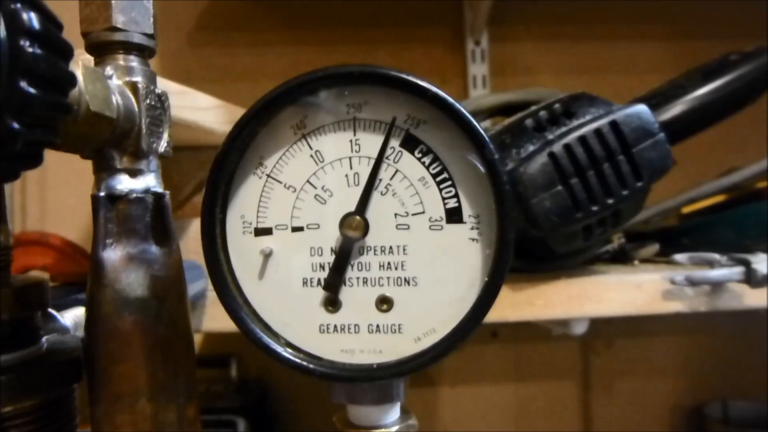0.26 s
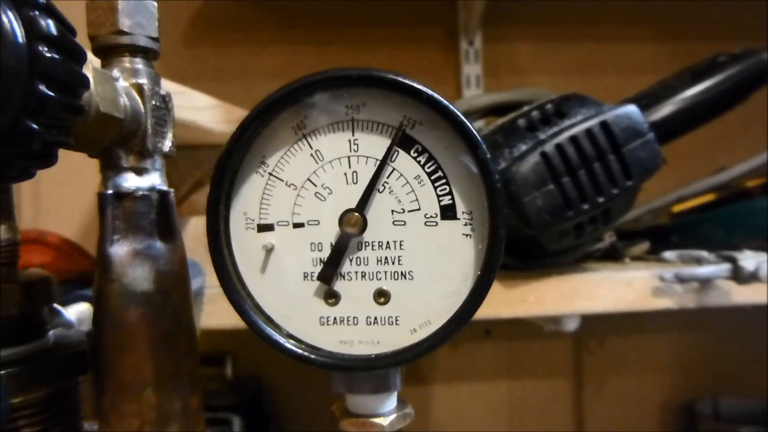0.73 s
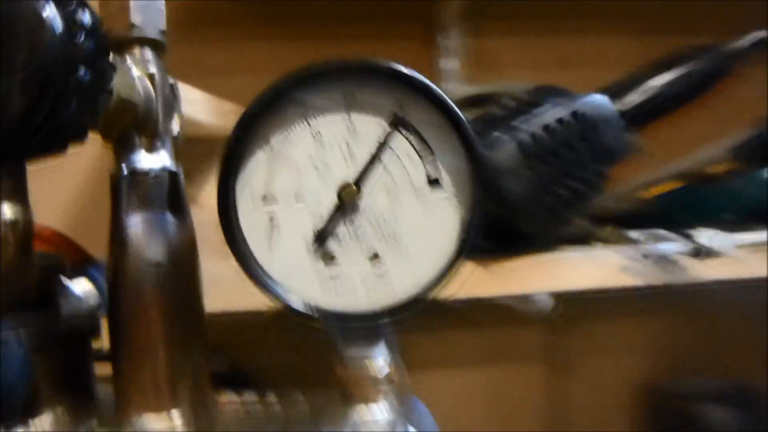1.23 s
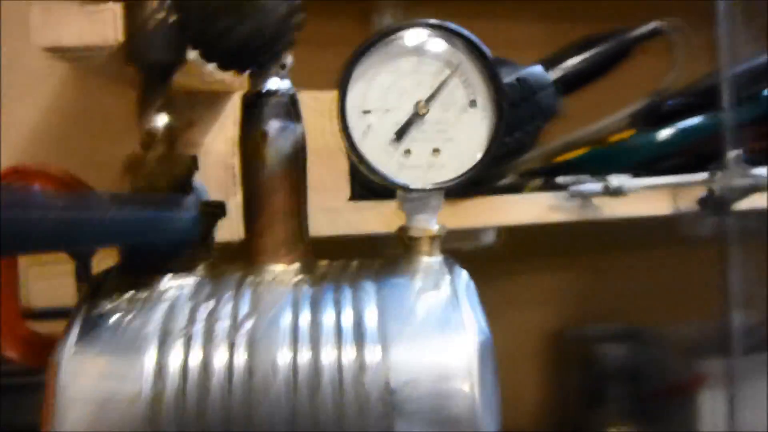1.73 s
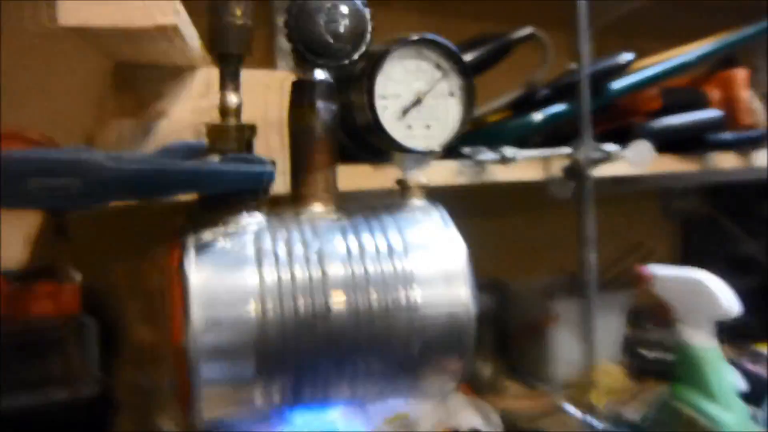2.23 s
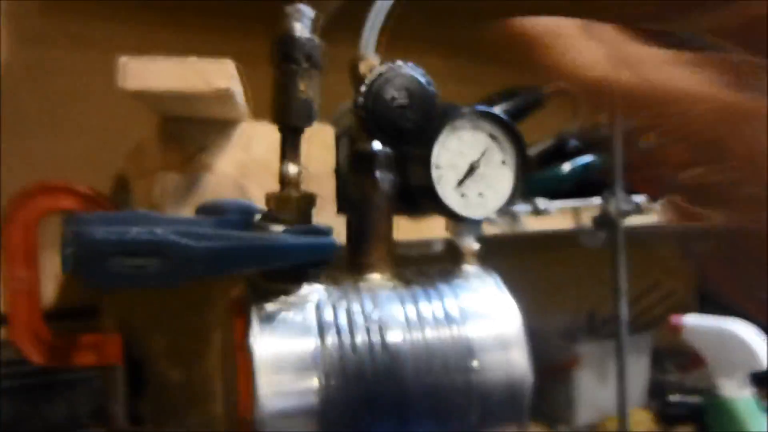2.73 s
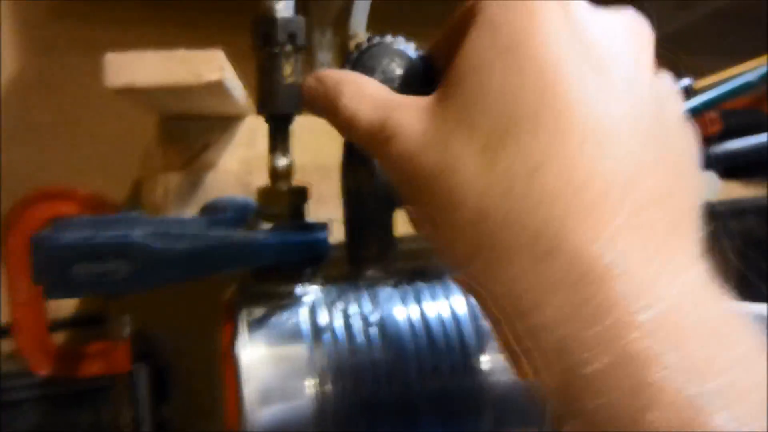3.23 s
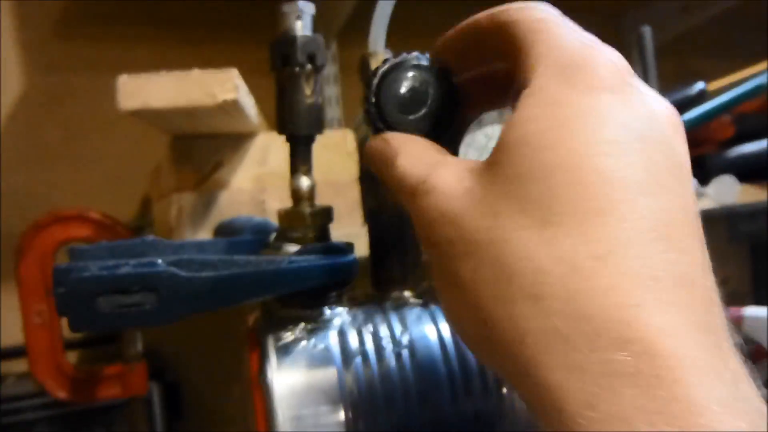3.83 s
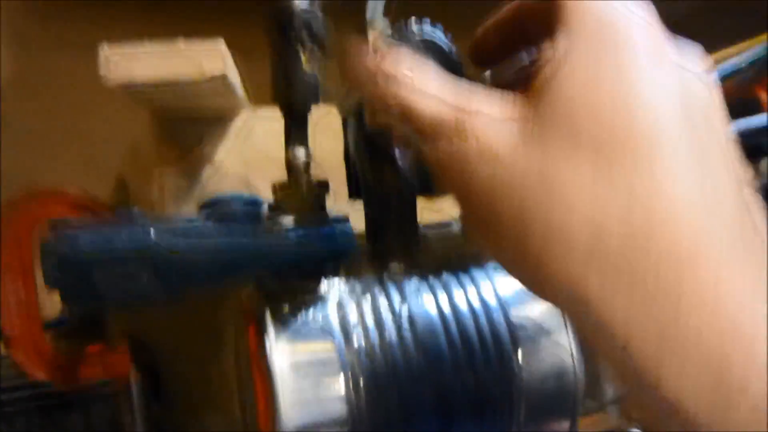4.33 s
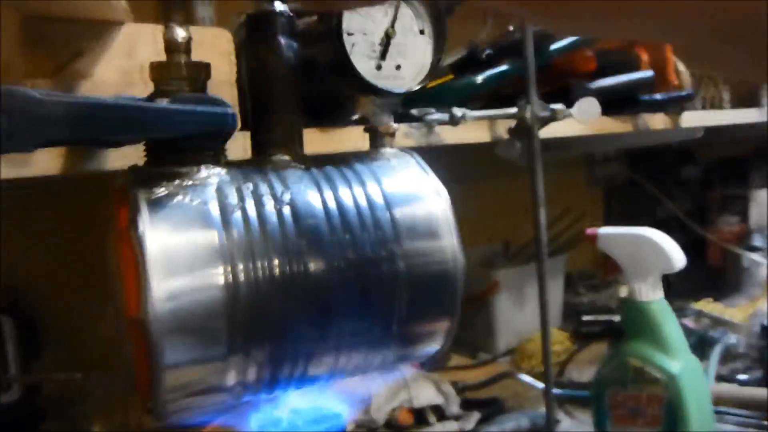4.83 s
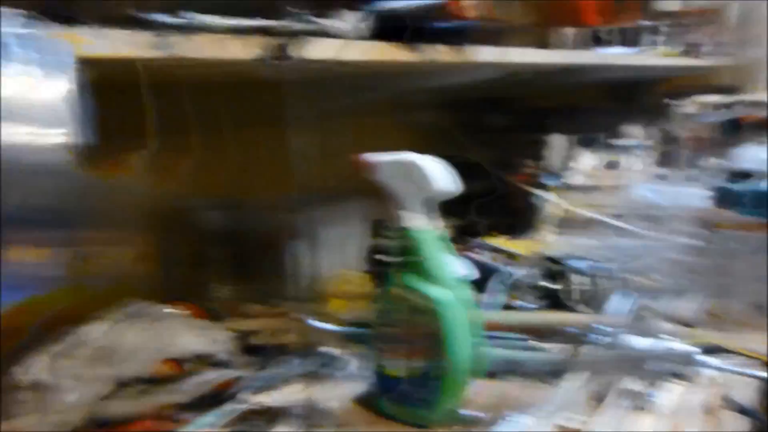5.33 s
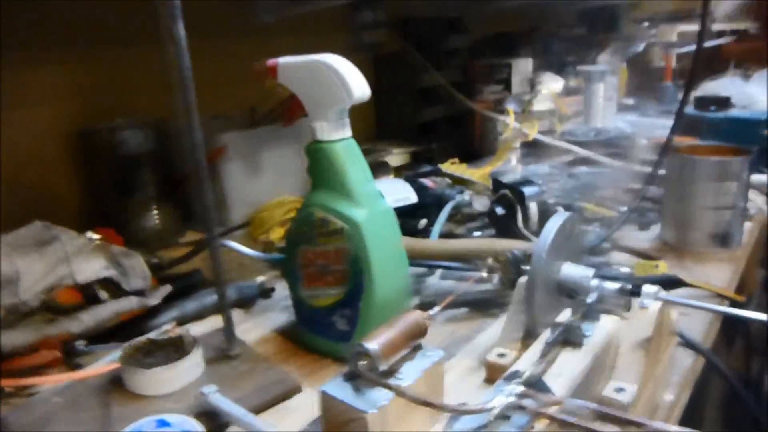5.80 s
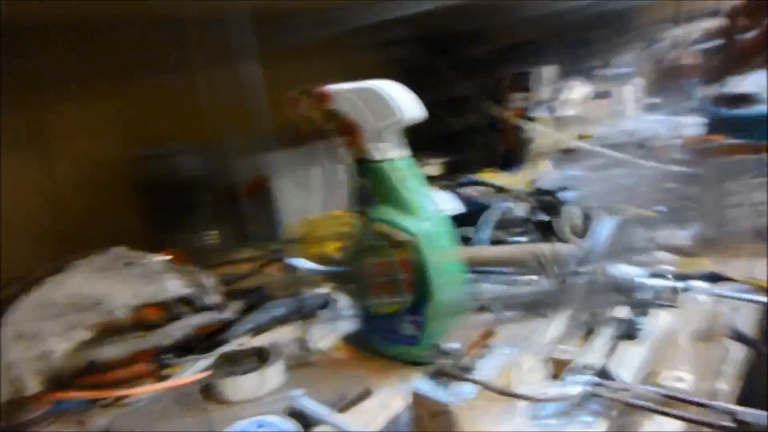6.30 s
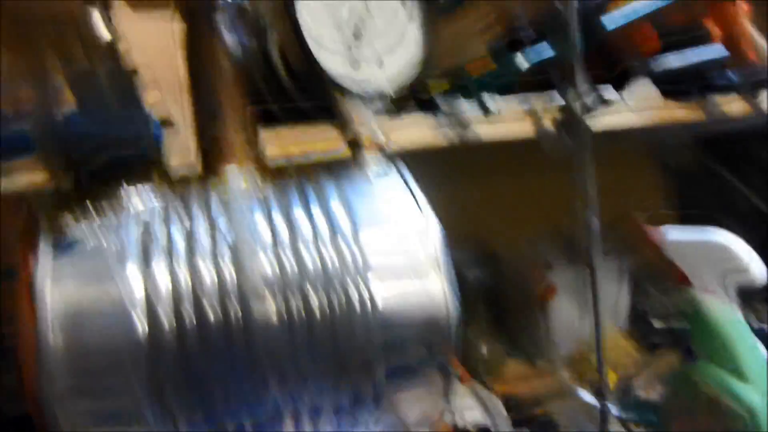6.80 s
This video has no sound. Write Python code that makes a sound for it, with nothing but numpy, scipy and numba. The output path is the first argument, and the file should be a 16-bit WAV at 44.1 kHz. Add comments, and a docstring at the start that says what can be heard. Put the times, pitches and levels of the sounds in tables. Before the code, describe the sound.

A small boiler rumbles and thumps under a steam hiss, with one loud valve blast before a model engine chuffs into motion.

```python
"""Tin boiler and model steam engine

A small boiler over a gas flame on a workshop bench. Its spring relief valve seeps, pops open, blows
and snaps shut; collapsing steam pockets thump in the shell. A hand opens the throttle and an engine
nearby chuffs, faster and faster. Automatic gain ducks under each blow and creeps back up."""
import sys
import numpy as np
from scipy import signal
from scipy.fft import rfft, irfft, next_fast_len
from scipy.io import wavfile
from numba import njit

SR = 44100
rng = np.random.default_rng(int(sys.argv[2]) if len(sys.argv) > 2 else 0)


def int16_out(signal):
    """Quantize to a 16-bit WAV file."""
    q = np.round(np.clip(np.atleast_2d(signal).T, -1, 1) * 32767)
    wavfile.write(sys.argv[1], SR, q.astype(np.int16))


N = 311346

# valve blows: (lift time [s], shut time [s], level [dB])
VALVE_BLOWS = [(-0.6, 0.019, -6), (2.63, 3.546, -13.5)]
# dips in the jet: (time [s], depth [dB], recovery [s])
JET_FALTERS = [(2.66, -3, 0.21), (2.965, -2, 0.047), (3.09, -3, 0.06), (3.261, -2.5, 0.12)]
# valve at the wandering microphone:
# (time [s], seep level [dB], left over right [dB], outlet resonance [Hz], bench echo lag [ms])
VALVE_AT_MIC = [(0, -31, 3, 5230, 0.92), (0.6, -31.5, 4, 5500, 0.89), (0.9, -32, 4, 5400, 0.94),
                (1.15, -32.5, 4, 5500, 0.91), (1.27, -31.5, 3, 5270, 0.91), (1.5, -32, 3, 5800, 0.82),
                (1.7, -30.5, 3, 6050, 0.51), (2.0, -33, 2, 6340, 0.58), (2.27, -31.5, 2.5, 5500, 0.53),
                (2.34, -33, 2, 5870, 0.57), (2.6, -34.5, 1.5, 5700, 0.52), (3.6, -39.5, 1, 5160, 0.49),
                (4.0, -37.5, .5, 4900, 0.41), (4.2, -36, .5, 4940, 0.43), (4.55, -36.5, 1, 4760, 0.455),
                (4.69, -34, 0.5, 5100, 0.44), (4.95, -34.5, 1, 5450, 0.36), (5.15, -34, 3, 6000, 0.44),
                (5.22, -35, 2.5, 6100, 0.5), (5.42, -35.5, 4.5, 5470, 0.59), (5.68, -36.5, 2, 5070, 0.62),
                (7.06, -35, 3, 5830, 0.44)]
# outlet resonances: (frequency ratio, width [Hz], level [dB])
OUTLET_MODES = [(1, 850, -2.5), (2.42, 1700, -9)]
# thin hiss of the valve near lifting, later of the steam line: (time [s], level [dB])
THIN_HISS = [(0.3, -45), (1.9, -40.5), (2.1, -34.5), (2.19, -34.5), (2.28, -36), (2.325, -30.5),
             (2.52, -30), (2.62, -28), (3.6, -43), (4.62, -38.5), (5.42, -37), (5.52, -32), (5.77, -29),
             (6.1, -32), (6.45, -32.5), (6.65, -48)]
# exhaust beats: (time [s], level [dB], preceding port whistle [dB])
EXHAUST_BEATS = [(5.707, -26, -90), (6.15, -24.5, -90), (6.322, -26, -41), (6.464, -25.5, -42.5),
                 (6.586, -25, -47), (6.697, -25, -43), (6.802, -25.5, -39.5), (6.906, -26.5, -41.5),
                 (6.998, -26.5, -45)]
# puffs within the slow first stroke: (time [s], level [dB])
FIRST_STROKE_LEAKS = [(5.77, -25.5), (6.017, -29.5)]
# port whistle of that stroke: (time [s], pitch [Hz], level [dB])
FIRST_STROKE_WHISTLE = [(5.72, 3200, -46), (5.78, 2620, -45), (5.85, 2190, -51), (5.93, 2120, -45),
                        (5.99, 2130, -53), (6.05, 2480, -43), (6.075, 2900, -41), (6.1, 3860, -40),
                        (6.12, 4200, -47)]
# boiling water: (time [s], rumble [dB], simmer [dB])
BOIL_LEVELS = [(0.1, -47.5, -54), (0.5, -49, -52), (1.0, -48.5, -52.5), (1.45, -50.5, -51), (2.0, -50, -52),
               (2.54, -48, -44), (3.6, -53.5, -57), (4.2, -51.5, -52.5), (4.8, -51.5, -53.5),
               (5.5, -49, -49), (6.23, -44, -43.5), (7.06, -47.5, -44)]
# steam pockets collapsing, valve lifting and seating: (time [s], knock drive [dB], boom drive [dB])
SHELL_THUMPS = [(0.004, -24, -26), (0.143, -20, -41), (0.23, -29, -44), (0.308, -36, -32), (0.43, -38, -63),
                (0.518, -40, -44), (0.543, -27, -35.5), (0.655, -41, -47), (0.756, -35, -27.5),
                (0.831, -30, -32), (0.883, -26, -35), (0.92, -30, -32), (0.975, -38, -56),
                (1.117, -36, -36), (1.203, -46, -34), (1.265, -39, -37), (1.327, -31, -35),
                (1.37, -37, -58), (1.396, -31, -40), (1.499, -24.5, -28), (1.653, -29, -32.5),
                (1.712, -26, -28), (1.729, -35, -41), (2.082, -26, -33), (2.158, -22.5, -28.5),
                (2.227, -21, -35), (2.539, -25, -30.5), (2.639, -23, -30.5), (2.795, -22, -32.5),
                (3.118, -11, -35), (3.538, -45, -31), (3.822, -44, -33), (3.886, -29, -33.5),
                (4.041, -52, -36), (4.167, -32, -36.5), (4.294, -37, -48), (4.358, -41, -40.5),
                (4.514, -37, -38), (4.848, -32, -37), (4.898, -43, -37), (4.97, -32, -30),
                (5.068, -35, -33), (5.17, -42, -26.5), (5.301, -31, -33.5), (5.39, -40, -32.5),
                (5.432, -27, -37), (5.502, -37, -38), (5.657, -31, -35), (5.849, -31, -37),
                (6.181, -35, -29), (6.267, -37, -33.5), (6.449, -50, -30)]
# shell resonances: (frequency [Hz], width [Hz], level [dB])
SHELL_MODES = [(200, 53, -8), (257, 40, -3.5), (311, 44, -14.5), (590, 100, -2), (790, 135, -5.5)]
# band the bench reflects: (low edge [Hz], high edge [Hz])
BENCH_BAND_HZ = [700, 15000]
# noise spectra: (frequency [Hz], relative density [dB])
JET_SPECTRUM = [(95, -41), (190, -14.5), (330, -13.5), (620, -14.5), (1050, -14), (1900, -16),
                (3300, -22.5), (3950, -7), (4450, -11), (5000, -4), (6000, -2.5), (7500, -10.5),
                (10000, -5.5), (12500, 1), (14200, 4.5), (15300, 1.5), (16000, 0.5)]
SPIT_SPECTRUM = [(500, -3), (2000, -1), (3300, 10), (6000, -3.5)]
SEEP_SPECTRUM = [(900, -20.5), (1500, -22), (2100, -16), (2500, -14.5), (3000, -12), (3450, -14.5),
                 (4050, -8), (4500, -12), (5100, -0.5), (6600, -3.5), (7300, -7), (8250, -7.5),
                 (10000, -15.5), (12800, -23.5), (15000, -20), (16000, -9.5)]
THIN_HISS_SPECTRUM = [(4410, -26), (7800, -4), (10300, -1), (13600, 3), (15200, -2), (16000, -10)]
CHUFF_SPECTRUM = [(470, -38), (800, -17), (1000, -5.5), (2530, -4.5), (2700, -9), (6320, 3), (7070, 0),
                  (13900, 2), (16000, -2.5)]
RUMBLE_SPECTRUM = [(26, -9), (45, 10.5), (54, -49), (103, 1), (264, 4), (356, 1.5), (452, -11), (496, -3),
                   (550, -17), (700, -22), (910, -33), (1540, -120)]
SIMMER_SPECTRUM = [(240, -12), (400, -2), (925, -1), (1130, -3.5), (1870, 0.5), (2060, -20), (2800, -2.5),
                   (3460, -4), (4000, 3), (5200, -18), (8800, -120)]
# stereo image: (frequency [Hz], left-right correlation)
JET_CORRELATION = [(300, .3), (1200, -.6), (2400, -.2), (3400, .65), (5000, .88), (7600, .72), (15000, .82)]
NEAR_CORRELATION = [(60, 0.55), (130, 0.89), (290, 0.82), (640, 0.82), (1410, 0.36), (3100, 0.8),
                    (6820, 0.76), (15000, 0.37)]
FAR_CORRELATION = [(800, 0.66), (15000, 0.48)]

TIME_S = np.arange(N) / SR


def valve_blow():
    """Lifted valve: a bright jet roughened by water drops, with a wet spit at the lift."""
    lift_s, snap_s, spit_s = 0.003, 0.022, 0.036
    creep_db, snap_db, spit_db = -12.5, -16.5, -21.5
    creep_db_per_s, tail_db_per_s = 118, 122
    flow = spit = 0
    for lift, shut, level_db in VALVE_BLOWS:
        age_s = TIME_S - lift
        shape_db = np.interp(TIME_S, [lift, lift + lift_s, shut, shut + snap_s], [creep_db, 0, 0, snap_db])
        shape_db -= creep_db_per_s * np.maximum(-age_s, 0)
        shape_db -= tail_db_per_s * np.maximum(TIME_S - shut - snap_s, 0)
        flow += from_db(level_db + shape_db)
        spit += from_db(spit_db) * np.clip(age_s / lift_s, 0, 1) * np.exp(-abs(age_s) / spit_s)
    falter_db = sum(np.interp(TIME_S, [s - .015, s, s + recovery_s], [0, depth_db, 0])
                    for s, depth_db, recovery_s in JET_FALTERS)
    jet = gusty_noise(JET_SPECTRUM, gust_db=.4, flicker_db=.7, rate_hz=16, stereo=JET_CORRELATION)
    jet = from_db(4) * butter(jet, 2, 8000, "low") - butter(jet, 2, 8000, "high")
    drops = from_db(1.34 * drift(146))
    spray = gusty_noise(SPIT_SPECTRUM, gust_db=2, flicker_db=3, rate_hz=60, bands=2,
                        stereo=JET_CORRELATION)
    return panned(flow * from_db(falter_db) * drops * jet + spit * spray, pan_db=np.full(N, 1.2))


def valve_seep():
    """Steam through the narrow seat hisses, rings the outlet and swells before each lift."""
    swell_db, swell_s = 10.5, 0.18
    level_db, pan_db, outlet_hz, _ = curves(VALVE_AT_MIC)
    for lift, *_ in VALVE_BLOWS:
        level_db += swell_db * np.exp(-abs(TIME_S - lift) / swell_s) * (TIME_S < lift)
    outlet = sum(from_db(mode_db) * whistle(ratio * outlet_hz, width_hz, correlation=0.89)
                 for ratio, width_hz, mode_db in OUTLET_MODES)
    hiss = from_db(-0.5) * gusty_noise(SEEP_SPECTRUM, gust_db=0.96, flicker_db=1.5, rate_hz=12)
    hiss += from_db(-2.5 + drift(9)) * outlet
    thin = gusty_noise(THIN_HISS_SPECTRUM, gust_db=.3, flicker_db=1, rate_hz=6, bands=3)
    thin *= from_db(curves(THIN_HISS)[0])
    return panned(from_db(level_db) * hiss + thin, pan_db)


def engine_chuffs():
    """Each exhaust puff opens within milliseconds and fades."""
    attack_s, t60_s = .003, 0.84
    puffs = np.zeros(N)
    for s, level_db, *_ in list(EXHAUST_BEATS) + list(FIRST_STROKE_LEAKS):
        age_s = np.maximum(TIME_S - s, 0)
        fade_db = -60 * age_s / t60_s - 0.5 * np.exp(-age_s / 0.017)
        puffs = np.maximum(puffs, from_db(level_db + fade_db) * (1 - np.exp(-age_s / attack_s)))
    return puffs * gusty_noise(CHUFF_SPECTRUM, gust_db=0.8, flicker_db=1.2, rate_hz=21, bands=4,
                               stereo=FAR_CORRELATION)


def port_whistle():
    """Before a beat the cylinder port whistles upward, breathier as it rises."""
    rest_hz, hz_per_beat_rate = 1724, 78
    path = [(5.6, 3200, -97)] + list(FIRST_STROKE_WHISTLE)
    for (start, *_), (end, _, db) in zip(EXHAUST_BEATS[1:], EXHAUST_BEATS[2:]):
        stroke_s = end - start
        clear_s = start + 0.55 * stroke_s
        top_s = clear_s + 0.195 * stroke_s
        hz = rest_hz + hz_per_beat_rate / stroke_s
        path += [(clear_s - .04, .96 * hz, -70), (clear_s - .012, .99 * hz, db - 2),
                 (clear_s + .006, hz, db), (clear_s + .012, 1.15 * hz, db),
                 (top_s, 1.8 * hz, db + 2), (top_s + .015, 1.9 * hz, -70)]
    pitch_hz, level_db = curves(path)
    width_hz = 220 + .5 * np.maximum(pitch_hz - 2450, 0)
    return from_db(level_db + 3.3 * drift(70)) * whistle(pitch_hz, width_hz, correlation=0.86)


def shell_thumps():
    """Each thump drives the shell with a push and a noise burst; small collapses fill the gaps."""
    pockets_per_s, churn_s, push_s = 55, 0.01, 0.00066
    rumble_db, _ = curves(BOIL_LEVELS)
    onsets = np.flatnonzero(rng.random(N) < pockets_per_s / SR)
    small = [(i / SR, rumble_db[i] + 10.5 + 3.5 * a, rumble_db[i] + 3.5 + 2 * b, churn_s / 3)
             for i, (a, b) in zip(onsets, rng.standard_normal((600, 2)))]
    knock, boom, push = np.zeros((3, N))
    for s, knock_db, boom_db, spread_s in [(*row, churn_s) for row in SHELL_THUMPS] + small:
        span = slice(max(int((s - .03) * SR), 0), int((s + .12) * SR))
        age_s = TIME_S[span] - s
        progress = (age_s + 0.0076) / spread_s
        knock[span] += from_db(knock_db - 16.5) * np.maximum(progress, 0) ** 2 * np.exp(2 - 2 * progress)
        boom[span] += from_db(boom_db - 3.5) * np.exp(-(progress - 1.3) ** 2 / 2)
        push[span] += from_db(boom_db - 5) * np.exp(-(age_s / push_s) ** 2) / (2 * np.pi ** 1.5 * push_s)
    mid, side = rng.standard_normal((2, N))
    shell = 0
    for hz, width_hz, level_db in SHELL_MODES:
        noise_gain = np.sqrt(SR / width_hz / 8)
        if hz < 450:  # low modes are mono
            drive = mid * boom * noise_gain + push / width_hz
        else:
            drive = (mid + 0.64 * side * [[1], [-1]]) * knock * noise_gain
        r = np.exp(-np.pi * width_hz / SR)
        zeros = np.array([1, 0, -1]) * (1 - r * r) / 2
        poles = [1, -2 * r * np.cos(2 * np.pi * hz / SR), r * r]
        shell = shell + from_db(level_db) * signal.lfilter(zeros, poles, drive + 1e-18)
    return shell


def boil():
    """Boiling water: a lumpy rumble under a steadier simmer."""
    rumble_db, simmer_db = curves(BOIL_LEVELS)
    lumps = from_db(2 * drift(49))
    rumble = gusty_noise(RUMBLE_SPECTRUM, gust_db=1.5, flicker_db=1.5, rate_hz=21, bands=4)
    simmer = gusty_noise(SIMMER_SPECTRUM, gust_db=2, flicker_db=2, rate_hz=9, bands=4)
    return from_db(rumble_db) * rumble * lumps + from_db(simmer_db) * simmer * lumps ** 0.13


def bench_echo(x):
    """One inverted reflection with a moving lag; combs the direct sound when added."""
    i = np.arange(N)
    lag_ms = curves(VALVE_AT_MIC)[-1]
    reflected = signal.sosfiltfilt(signal.butter(1, BENCH_BAND_HZ, "band", fs=SR, output="sos"), x)
    return -0.22 * np.array([np.interp(i - lag_ms * SR / 1000, i, side) for side in reflected])


def workshop(x, t60_s=0.075, wet_db=-10, places=24):
    """Shelves and clutter add a short dense tail that changes as the microphone wanders."""
    age_s = np.arange(SR // 6) / SR
    hop = N // (places - 1) + 1
    wet = np.zeros((2, N))
    for k in range(places):
        tail = rng.standard_normal(len(age_s)) * from_db(-60 * age_s / t60_s) * (age_s > .002)
        tail = signal.lfilter([1, .9], [1], tail)  # dulls the tail
        tail /= np.linalg.norm(tail)
        span = slice(max(k - 1, 0) * hop, (k + 1) * hop)
        crossfade = np.cos(np.pi / 2 * (np.arange(N)[span] / hop - k))
        heard = signal.fftconvolve(x[:, span] * crossfade, tail[None], axes=1)[:, :N - span.start]
        wet[:, span.start:span.start + heard.shape[1]] += heard
    return x + from_db(wet_db) * wet


def gain_control(x, limit_db=-21, hold_back=0.66, detect_s=0.0054, duck_s=0.027, recover_s=0.79):
    """Holds back most of the excess over the limit: fast duck, exponential recovery."""
    level_db = 10 * np.log10(smooth(np.mean(x ** 2, axis=0), detect_s) + 1e-12)
    over_db = np.maximum(level_db - limit_db, 1e-3)
    decay = TIME_S / recover_s
    held_db = np.exp(np.maximum.accumulate(np.log(over_db) + decay) - decay)
    return x * from_db(-hold_back * smooth(held_db, duck_s))


def gusty_noise(spectrum, gust_db, flicker_db, rate_hz, bands=6, stereo=NEAR_CORRELATION):
    """Coloured stereo noise; its bands gust together and flicker separately; rms 1."""
    size = next_fast_len(N)
    hz = np.maximum(np.arange(size // 2 + 1) * SR / size, 1)
    mid, side = rfft(rng.standard_normal((2, size))) * from_db(at_hz(spectrum, hz))
    bins = left_right(mid, side, at_hz(stereo, hz))
    band_index = at_hz([(spectrum[0][0], 0), (spectrum[-1][0], bands - 1)], hz)
    noise = 0
    for k in range(bands):
        band = irfft(bins * np.clip(1 - abs(band_index - k), 0, 1), size)[:, :N]
        noise += band * from_db(flicker_db * drift(rate_hz))
    return rms_one(noise * from_db(gust_db * drift(rate_hz)))


def whistle(hz, width_hz, correlation):
    """Stereo noise twice through a moving resonance; rms 1."""
    r = np.exp(-np.pi * width_hz / SR) * np.ones(N)
    mid, side = [resonate(resonate(white, hz, r), hz, r) / np.sqrt(width_hz)
                 for white in rng.standard_normal((2, N))]
    return rms_one(left_right(mid, side, correlation))


@njit
def resonate(x, hz, r):
    """Band-pass with moving centre and pole radius r; peak gain 1."""
    y = np.zeros_like(x)
    for i in range(2, len(x)):
        y[i] = ((1 - r[i] ** 2) / 2 * (x[i] - x[i - 2])
                + 2 * r[i] * np.cos(2 * np.pi * hz[i] / SR) * y[i - 1] - r[i] ** 2 * y[i - 2])
    return y


def drift(rate_hz):
    """Random wander: coarse noise through two one-pole low-passes; rms 1."""
    step, settle = 40, 2000
    r = np.exp(-2 * np.pi * rate_hz * step / SR)
    slow = signal.lfilter([1], [1, -2 * r, r * r], rng.standard_normal(N // step + settle + 2))[settle:]
    return np.interp(np.arange(N) / step, np.arange(len(slow)), rms_one(slow))


def smooth(x, tau_s):
    """One-pole smoothing from the opening level."""
    r = np.exp(-1 / (tau_s * SR))
    return signal.lfilter([1 - r], [1, -r], x, zi=[r * x[:SR // 50].mean()])[0]


def butter(x, order, hz, kind):
    return signal.sosfilt(signal.butter(order, hz, kind, fs=SR, output="sos"), x)


def curves(rows):
    """Columns of a time table, per sample."""
    times_s, *columns = np.transpose(rows)
    return [np.interp(TIME_S, times_s, column) for column in columns]


def at_hz(rows, hz):
    """Table lookup on a log-frequency axis."""
    knots_hz, values = np.transpose(rows)
    return np.interp(np.log(hz), np.log(knots_hz), values)


def left_right(mid, side, correlation):
    return np.sqrt(1 + correlation) * mid + np.sqrt(1 - correlation) * side * [[1], [-1]]


def panned(x, pan_db):
    return x * from_db([pan_db / 2, -pan_db / 2])


def from_db(db):
    return 10 ** (np.asarray(db) / 20)


def rms_one(x):
    return x / np.sqrt(np.mean(x ** 2) + 1e-20)


def scene():
    """Boiler on the bench, engine farther off, both in the workshop."""
    boiler = valve_seep() + valve_blow() + boil() + shell_thumps()
    engine = engine_chuffs() + port_whistle()
    return workshop(boiler + bench_echo(boiler) + engine)


def record(dry):
    """Low cut, gain control, rounded peaks, steep top cut, small converter bias."""
    low_cut_hz, top_cut_hz, bias = 70, 15500, -.0031
    mic = np.tanh(gain_control(butter(dry, 3, low_cut_hz, "high")))
    return signal.sosfilt(signal.ellip(14, .5, 70, top_cut_hz, fs=SR, output="sos"), mic) + bias


dry = scene()
out = record(dry)
int16_out(out)
```